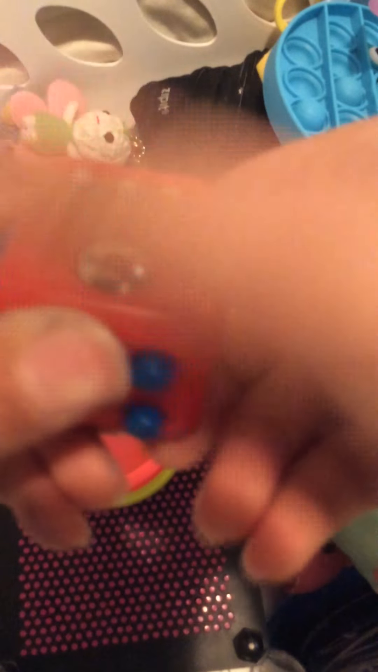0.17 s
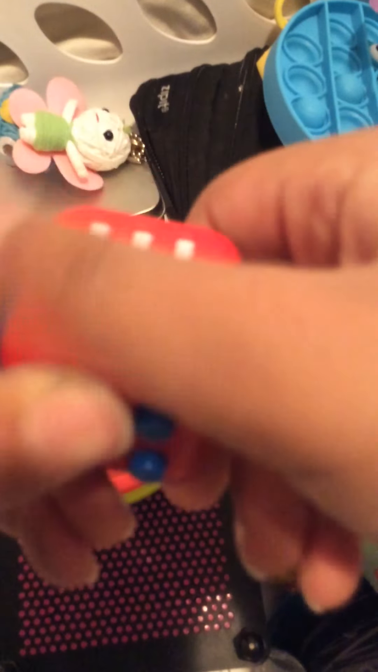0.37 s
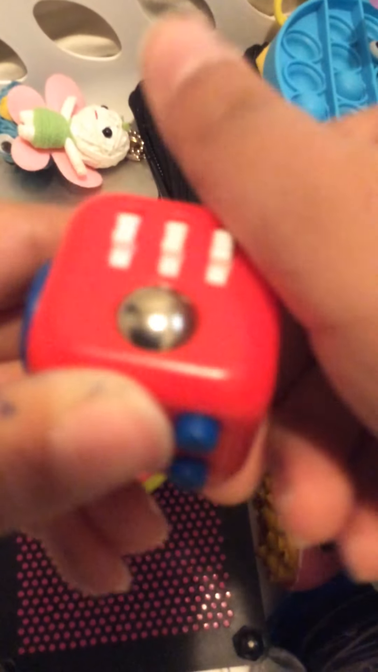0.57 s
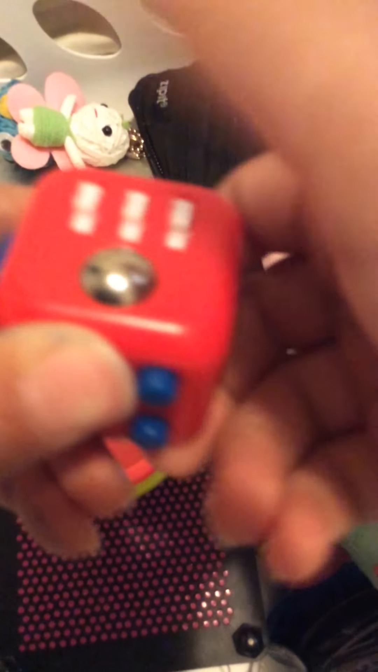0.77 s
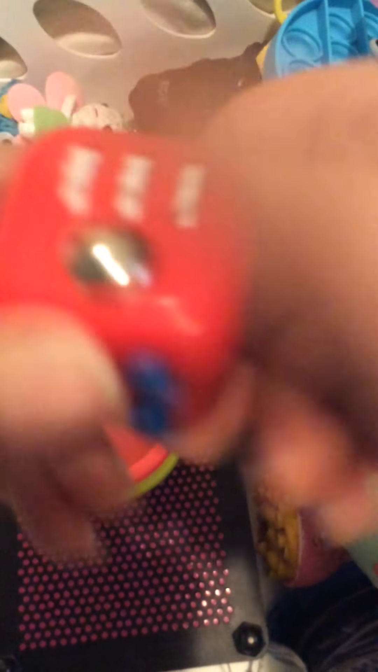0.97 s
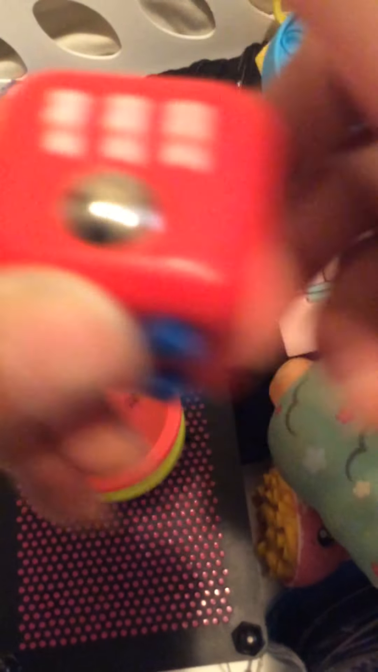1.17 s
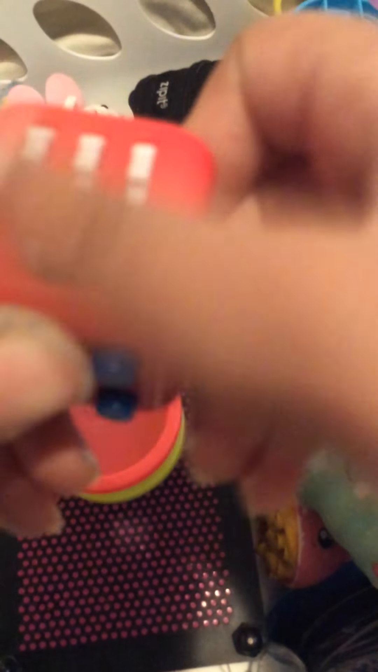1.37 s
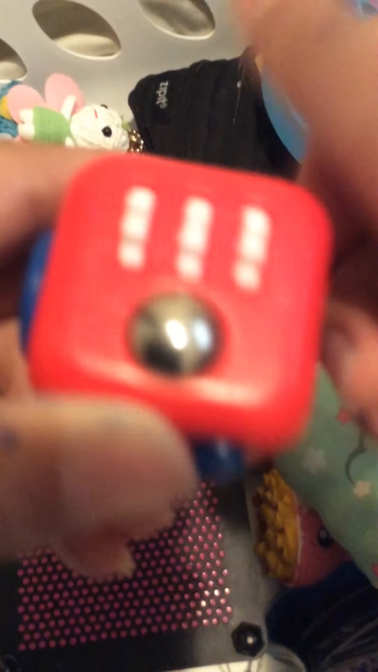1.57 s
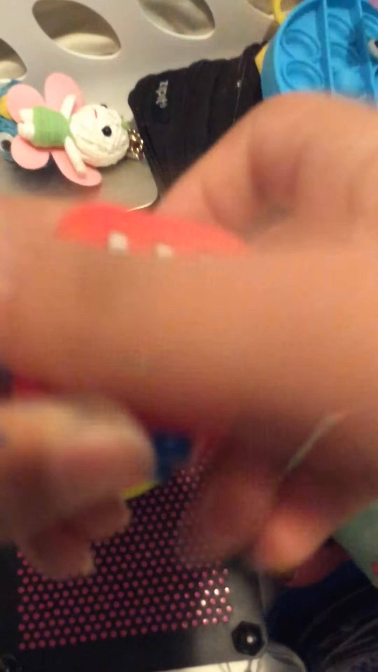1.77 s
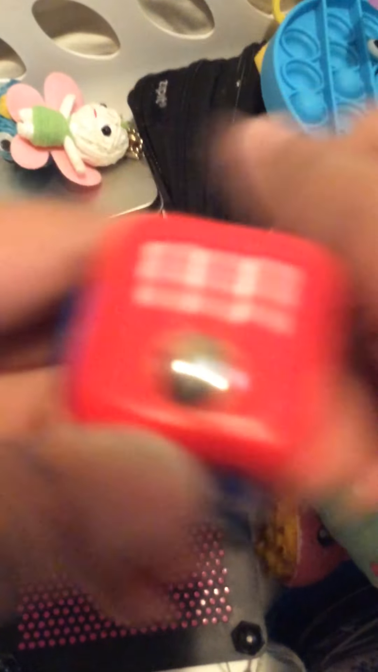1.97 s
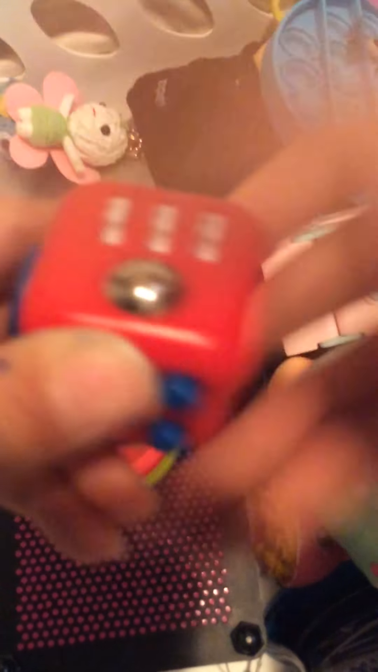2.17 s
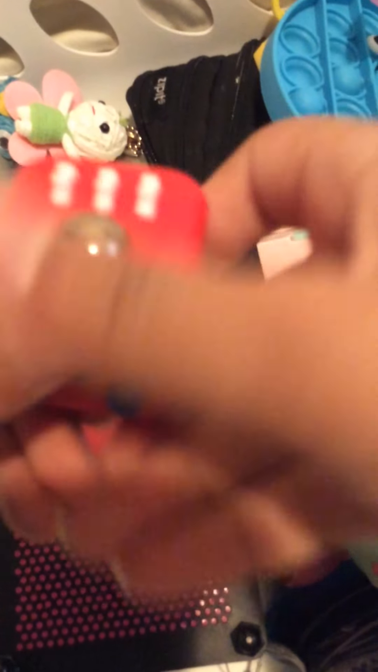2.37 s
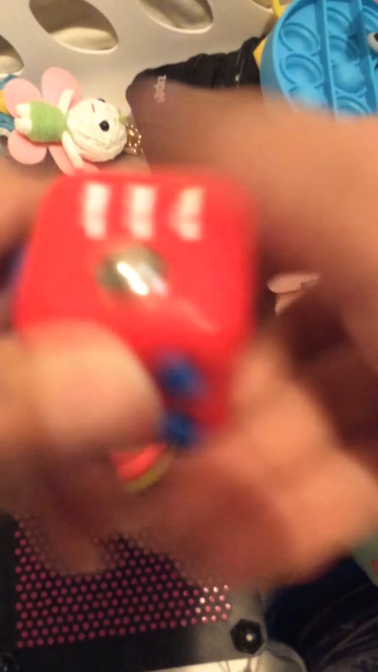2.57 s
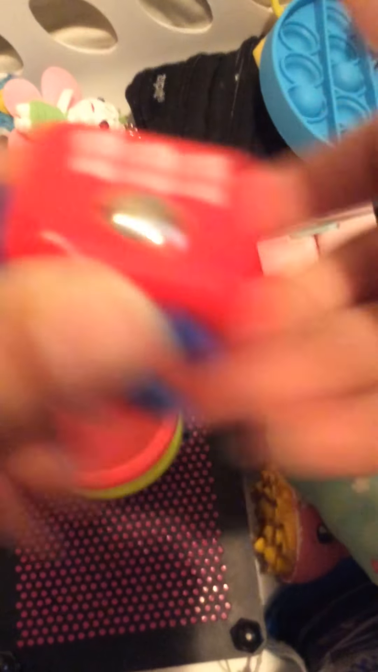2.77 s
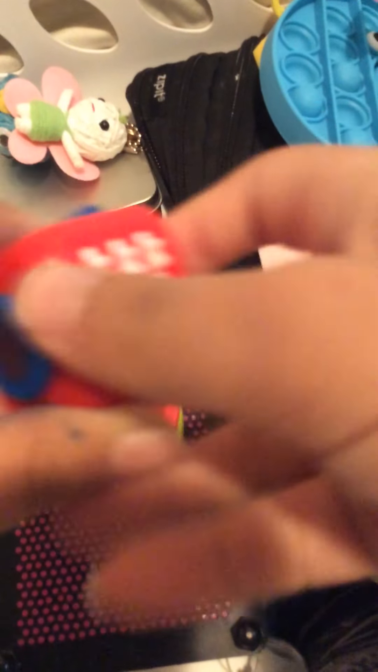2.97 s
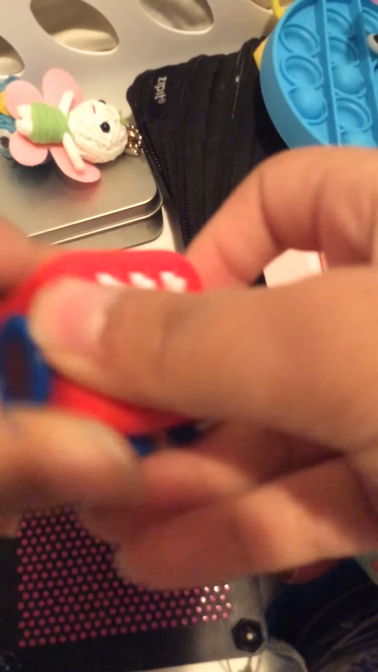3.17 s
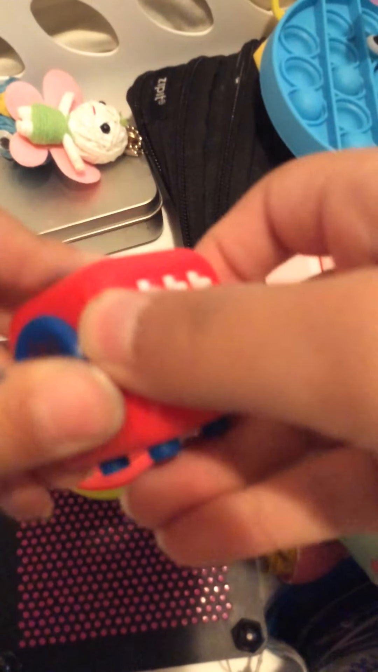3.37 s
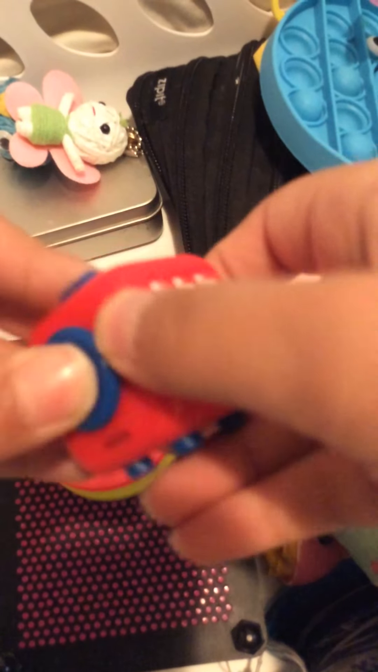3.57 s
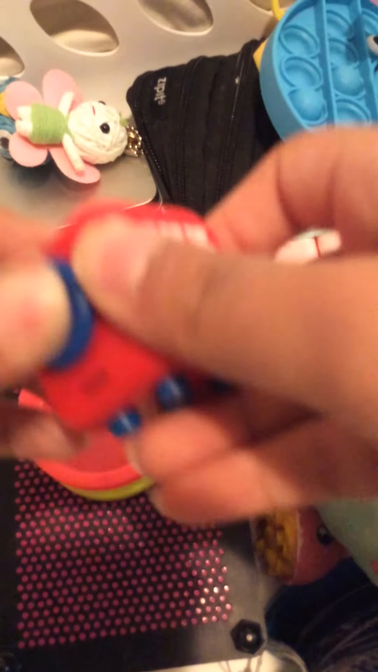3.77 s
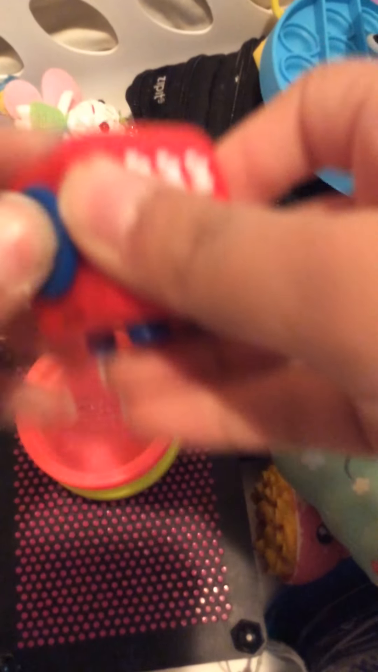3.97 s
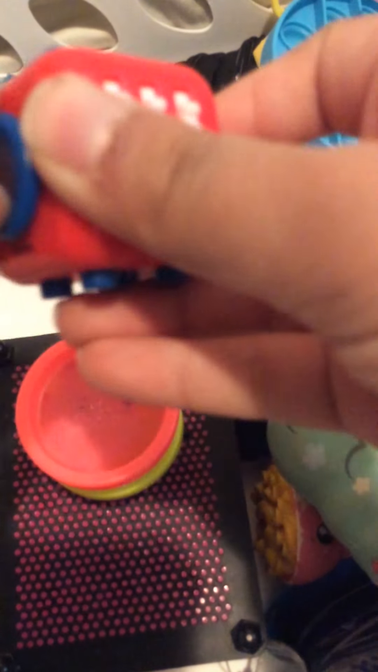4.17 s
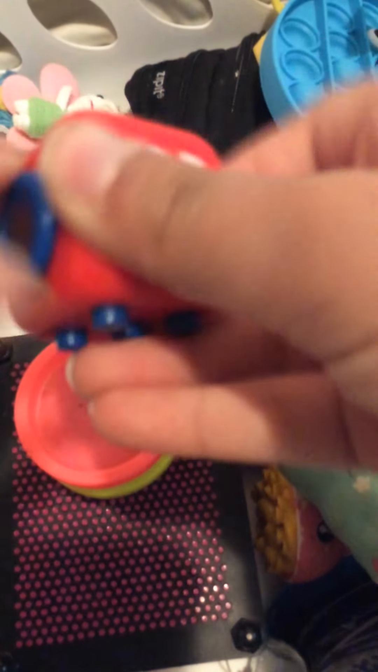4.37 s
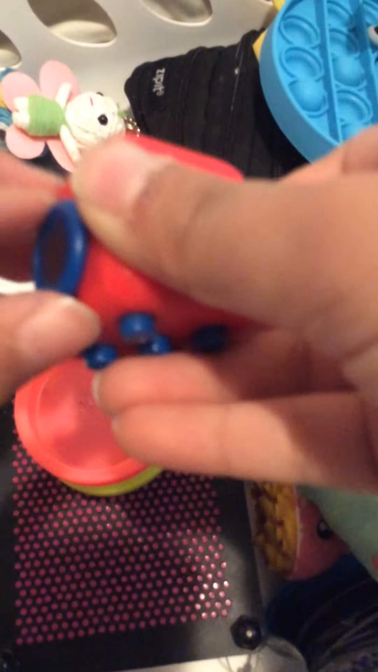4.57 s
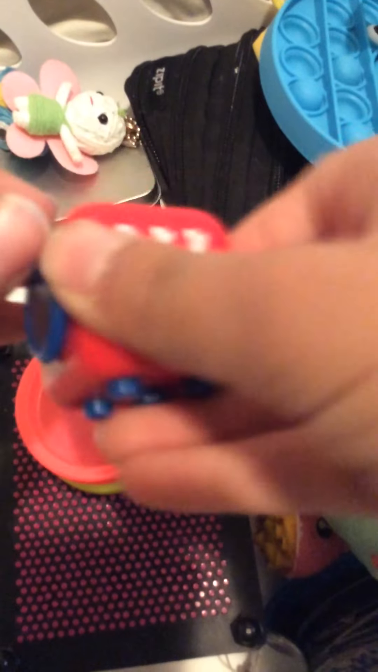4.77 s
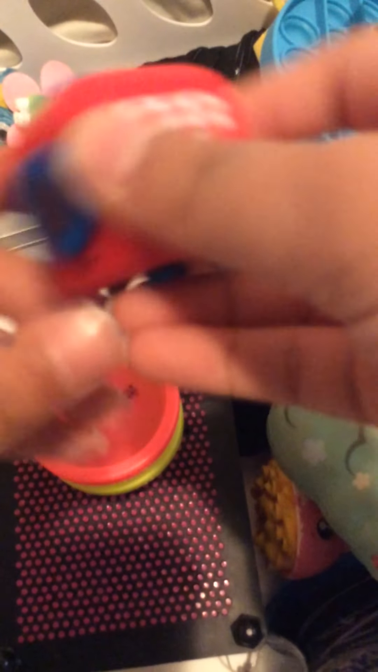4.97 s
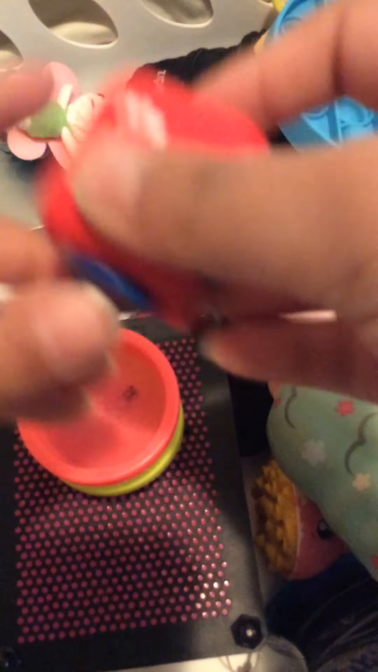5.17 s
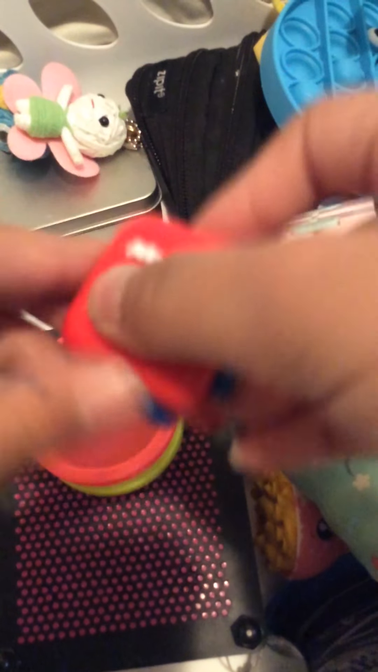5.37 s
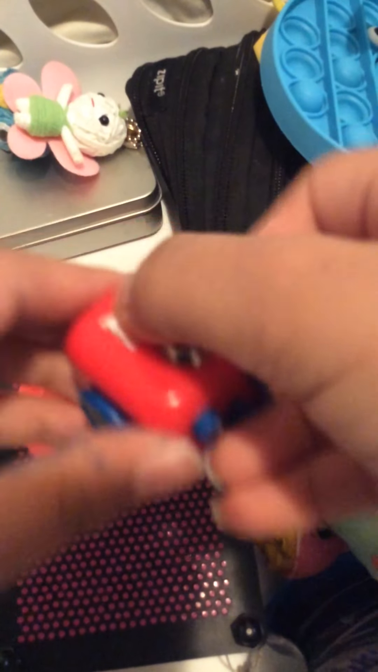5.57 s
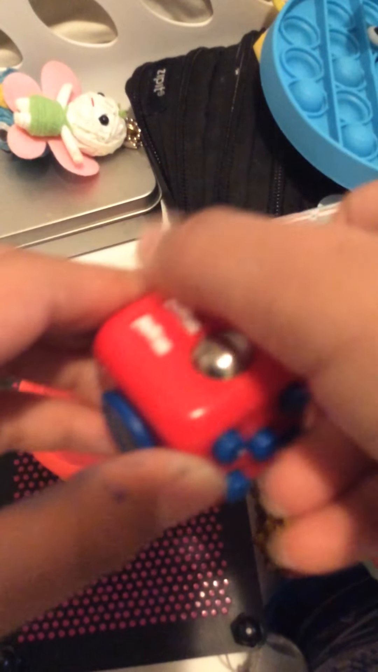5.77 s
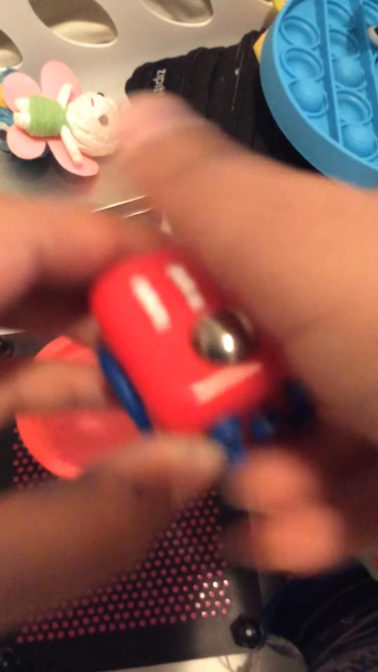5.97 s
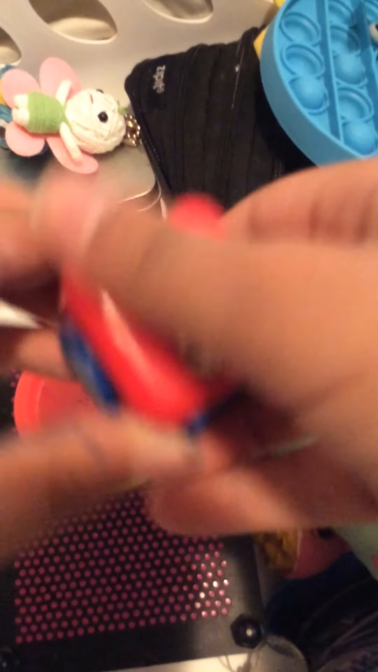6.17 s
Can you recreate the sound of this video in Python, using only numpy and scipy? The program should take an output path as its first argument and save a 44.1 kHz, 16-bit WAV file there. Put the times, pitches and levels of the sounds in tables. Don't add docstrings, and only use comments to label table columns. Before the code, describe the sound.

Very close to a phone microphone in a quiet, soft room, a thumb swipes the ratchet gears of a hollow plastic toy five times, each a fast, crisp burst of clicks with a dull knock. After a regrip come light, irregular ticks of a dial and loose buttons, with two brief rattling shakes. Soft skin rubbing and a faint distant machine hum lie underneath.

```python
import sys
import numpy as np
from scipy import signal
from scipy.fft import rfft, irfft
from scipy.io import wavfile
from scipy.ndimage import uniform_filter1d

SR = 44100
rng = np.random.default_rng(int(sys.argv[2]) if len(sys.argv) > 2 else 0)


def decibels_to_gain(level_db):
    exponent = np.asarray(level_db, float) / 20
    return 10 ** exponent


def to_wav(sig):
    pcm = np.clip(np.atleast_2d(sig), -1, 1) * 32767
    pcm = np.round(pcm).astype(np.int16)
    wavfile.write(sys.argv[1], SR, pcm.T)


N = 274743

GEAR_PANEL_HZ, BUTTON_PANEL_HZ = 5506, 4520


def evened(x):
    return x / np.sqrt(np.mean(x ** 2) + 1e-20)


def peaked(x):
    return x / abs(x).max()


def read(points, hz):
    f, value = np.transpose(points)
    return np.interp(np.log(hz + 1), np.log(f + 1), value)


def add(mix, s, sound):
    at = round(s * SR)
    part = mix[max(at, 0):at + len(sound)]
    part += sound[max(-at, 0):][:len(part)]


def resonate(x, hz, width_hz):
    r = np.exp(-np.pi * width_hz / SR)
    return signal.lfilter([1 - r, 0, r - 1], [1, -2 * r * np.cos(2 * np.pi * hz / SR), r * r], x)


def coloured(points):
    gain = decibels_to_gain(read(points, np.fft.rfftfreq(N, 1 / SR)))
    return irfft(rfft(rng.standard_normal(N)) * gain, N)


def snaps():
    # start in seconds, shell ring in dB, panel ring in dB, crack in dB, tooth tip in dB.
    swipes = [(0.4773, -20, -14.5, -16, -22.5), (0.479, -19.5, -23, -19.5, -24),
              (0.482, -33.5, -32.5, -35.5, -37), (0.494, -38, -37, -28.5, -35),
              (0.4956, -38, -40, -26.5, -26.5), (0.4948, -34, -29.5, -23, -25.5),
              (0.4998, -16.5, -23.5, -5.5, -11), (0.5006, -10, -18, -15.5, -14.5),
              (0.5061, -21, -28.5, -18, -9.5), (0.5126, -40, -33.0, -29.5, -28.5),
              (0.5146, -34.5, -25.5, -6, -11.5), (0.5162, -35.5, -18, -15.5, -4.5),
              (0.5173, -37.5, -25.5, -22.5, -24.5), (0.5214, -42, -33, -28, -28),
              (0.5215, -36, -31.5, -28, -18.5), (0.5257, -32.5, -16.5, -3.5, -5.5),
              (0.5278, -36, -19, -15, -14), (0.5295, -37, -24.5, -17, -22),
              (0.5307, -35, -26, -11.5, -20), (0.5323, -41, -25.5, -16, -27),
              (0.5335, -44, -23, -14, -23.5), (0.5361, -48.5, -25, -23.5, -24.5),
              (0.555, -46.5, -28, -36, -39), (1.0279, -16, -21.5, -13, -17),
              (1.0272, -36.5, -22, -28, -28), (1.0303, -17.5, -25.5, -32, -36.5),
              (1.0403, -19, -24.5, -19.5, -21.5), (1.0412, -15, -16, 0, 1),
              (1.043, -21, -29.5, -14, -8.5), (1.046, -32, -15, -11, -8),
              (1.047, -37.5, -15, -10.5, -5), (1.0517, -32, -26, -21.0, -17.5),
              (1.0536, -27, -19, -25, -23.5), (1.054, -40, -27, -22, -22.5),
              (1.0563, -44.5, -15.5, -23, -11), (1.06, -39.5, -32.5, -27.5, -27.5),
              (1.059, -32, -30, -29.5, -36), (1.0605, -32, -39, -33.5, -28.5),
              (1.069, -34, -22, -16.5, -15.5), (1.069, -34.5, -25.5, -8.5, -18.5),
              (1.491, -51, -42.5, -30.5, -34.5), (1.495, -37.5, -27, -24.5, -29.5),
                    (1.499, -44, -22.5, -21.5, -18.5), (1.5003, -40.5, -17.5, -7, -10.5),
                    (1.504, -34.5, -28, -27.5, -31.5), (1.509, -33, -11.5, -5, 0.5),
                    (1.5123, -38, -21.5, -27, -20), (1.516, -36, -37, -30.5, -26.5),
                    (1.517, -29, -16.5, -5, -3), (1.5178, -35, -18, -9, -10.5),
                    (1.5226, -36, -19, -21, -12), (1.5254, -32.5, -17.5, -7.5, -6),
                    (1.5268, -34.5, -19, -4.5, -10), (1.5282, -45, -23.5, -18, -19.5),
                    (1.5295, -47, -28, -22.5, -30.5), (1.534, -42.5, -24, -26, -27.5),
                    (1.5332, -44.5, -26.5, -19, -20.5), (1.5373, -40.5, -25.5, -10, -9.5),
                    (1.5395, -47.0, -23.5, -16, -21.5), (1.5414, -50.5, -33.5, -30, -31),
                    (1.5417, -54.5, -35.5, -34.5, -32), (1.5456, -42.5, -35, -20.5, -25),
                    (1.9023, -61.5, -63, -60, -52), (1.9042, -63.5, -62, -52, -47),
                    (1.9067, -64, -57, -48.5, -42.5), (1.91, -48, -34.5, -22.5, -29),
                    (1.953, -58, -34, -41, -43.5), (1.96, -43, -27, -24.5, -28),
                    (1.983, -60.5, -43, -35.5, -36.5), (1.9912, -49, -29.5, -26, -32.5),
                    (1.9936, -46.5, -34.5, -18, -18.5), (1.995, -48, -28.5, -15.5, -21),
                    (1.999, -48.5, -23.5, -13.5, -4), (2.0013, -41, -23.5, -26, -19.5),
                    (2.002, -35, -13, -11.5, -4), (2.0019, -47.5, -13, -9.5, -18),
                    (2.006, -33.5, -14.5, -7, -7.5), (2.0042, -39.5, -18.5, -11, -14),
                    (2.0112, -39, -43.5, -28, -25), (2.0086, -34, -27.5, -13.5, -18),
              (2.518, -64.0, -51, -51, -27), (2.52, -62.0, -52.5, -49, -25),
                  (2.523, -64.0, -58, -52, -29), (2.526, -56, -47.0, -42, -25),
                  (2.5298, -49, -37.5, -30, -30), (2.5329, -66.5, -52, -37, -45),
                  (2.5376, -33, -53, -36, -40), (2.5392, -58, -32, -33, -34), (2.5431, -32, -17, -8.5, -19),
                  (2.548, -62, -39, -32, -40), (2.5492, -38, -37.5, -40, -36.5),
                  (2.555, -39, -45.5, -40, -51), (2.625, -45, -41, -35.5, -35),
                  (2.6236, -40, -40.5, -29, -24.5), (2.626, -66, -30, -26.5, -34),
                  (2.629, -42, -37.5, -34, -38), (2.6327, -64, -42, -41, -53), (2.638, -48, -48, -49, -45),
                  (2.6435, -50, -18, -12, -17), (2.647, -47, -33, -31, -27), (2.6486, -61, -40, -38.5, -40),
                  (2.6523, -42, -23, -17, -29), (2.6545, -29, -17, -11.5, -12),
                  (2.6557, -67.5, -13, -44, -10), (2.6611, -34.5, -35, -27, -37),
                  (2.6654, -45.5, -25, -17, -25), (2.6686, -53, -36, -23, -37),
                  (2.6704, -48, -28, -17, -18), (2.6726, -24.5, -8.5, -16, -13),
                  (2.689, -43, -54, -55, -49), (2.6946, -46, -51, -47, -46), (2.7024, -40.5, -33, -34, -20),
                  (2.7116, -40.5, -26, -32, -45), (2.7136, -42, -32, -28, -37.5)]
    rattles = [(4.0453, -63, -55, -72.5, -71), (4.049, -43.5, -49, -50, -57),
               (4.0508, -57.5, -57, -54, -64), (4.0586, -63, -53, -67, -64), (4.068, -35, -43, -32.5, -41),
               (4.065, -51, -36, -39, -44.0), (4.0696, -54, -33, -44.0, -44.5),
               (4.074, -54, -41, -35, -42.0), (4.0766, -27, -27, -34, -38),
               (4.0834, -33, -34, -30.5, -47.0), (4.0857, -45, -39, -45, -49), (5.776, -74, -63, -56, -54),
               (4.0866, -56, -33, -56, -52.0), (4.096, -58.0, -47.0, -57, -55.5),
               (4.0975, -63, -50.0, -41, -37), (4.099, -69, -57, -34, -27.5), (4.102, -67.0, -67, -53, -43),
               (5.716, -46.5, -23.5, -24.5, -38), (5.721, -45.5, -34, -35, -35),
               (5.7476, -47, -27, -30, -27), (5.7566, -56, -61, -41, -51.0), (5.8065, -49, -29.5, -37, -35),
               (5.811, -59, -44, -39, -45), (5.815, -45, -35, -23.5, -41), (5.8193, -66.5, -40, -39, -45.5),
               (5.824, -60, -43, -39.0, -44.0), (5.827, -58, -41, -49.0, -54.5), (5.85, -54, -62, -31, -37),
               (5.8509, -70, -48, -40, -48), (5.8538, -63, -38, -44.0, -44), (5.862, -53, -39, -41, -44),
               (5.889, -61, -54, -42, -43), (5.911, -66, -39, -34, -45), (5.9155, -63, -34.5, -27, -41.0),
               (5.918, -55, -49, -26, -24), (5.9193, -58, -58, -18.5, -19), (5.929, -61.5, -46, -55, -49),
               (5.947, -66, -69, -64, -48)]
    # start in seconds, shell ring in dB, panel ring in dB, crack in dB.
    touches = [(.0096, -64, -41, -29), (0.03, -66, -38, -47), (0.0351, -48, -32, -29.5),
               (0.039, -44.5, -41, -27), (0.183, -71, -42.5, -35), (0.191, -56.5, -47, -50),
               (.325, -43, -45.5, -45), (0.3817, -59, -57, -46), (0.3924, -51.5, -45, -46),
               (0.963, -38, -46.5, -48), (0.97, -42.5, -48.5, -37), (1.1085, -35.5, -44, -42),
               (1.3958, -40.5, -48.5, -34.5), (1.4528, -68.5, -61, -33.5), (1.5763, -45, -36.5, -33.5),
               (1.5926, -41, -40, -33.5), (1.6507, -56, -45.5, -66), (1.8735, -48.5, -52, -53.5),
               (1.934, -53.5, -39, -34.5), (2.5, -71, -56, -37), (2.174, -57, -35.5, -78),
               (2.272, -46.5, -61, -53), (2.28, -45, -56, -53), (2.339, -47.5, -59, -48),
               (2.377, -53.5, -50.5, -58), (2.409, -66, -52, -56.5), (2.428, -57.5, -58, -61.5),
               (2.441, -67, -59, -62), (2.249, -59, -49, -48.5)]
    dial = [(2.826, -68, -39, -61), (2.84, -71, -38, -40.5), (2.867, -46, -35.5, -25),
            (2.8846, -51, -42, -64), (3.004, -52, -46, -55), (3.0718, -43.5, -27, -36.5),
            (3.22, -56, -37, -46), (3.286, -60, -37, -51), (3.293, -46.5, -46, -32), (3.315, -60, -47, -42),
            (3.325, -54, -43, -48), (3.406, -40, -40, -76), (3.5777, -34.5, -31, -32.5),
            (3.702, -55, -39, -39), (4.148, -49, -57, -46.5), (4.773, -63, -67, -35.5),
            (4.7881, -71, -28, -28), (4.8611, -73, -42.5, -38), (4.927, -45, -69, -51),
            (4.936, -39, -43, -30.5), (4.9666, -41.5, -44, -42), (5.3512, -69, -37.5, -54),
            (5.4612, -55, -51, -45), (5.5784, -64, -43.5, -41), (6.081, -67, -34.5, -27),
            (6.108, -53, -46.5, -50)]
    buttons = [(2.993, -62, -45, -48), (3.121, -37, -51, -52), (3.174, -40, -51.5, -58),
               (3.2335, -51, -67, -38), (3.3995, -45.5, -40.5, -54), (3.52, -54, -63, -47),
               (3.5414, -52, -53.5, -50), (3.5808, -33, -45, -64), (3.6415, -33, -42, -42.5),
               (3.9361, -59, -47, -49), (3.9538, -53.5, -46, -50), (3.995, -58.5, -59, -66),
               (4.125, -59, -51, -71), (4.139, -53.5, -44, -64), (4.435, -55.5, -45, -48.5),
               (4.46, -45, -48, -58), (4.7794, -32, -30, -36.5), (4.952, -48, -49, -34.5),
               (5.2036, -52, -41, -77), (5.228, -38, -46, -51), (5.456, -52, -49, -33.5),
               (5.6088, -52, -57.5, -36), (6.021, -55, -45, -45.5), (6.179, -49.5, -40, -67)]
    faint = [(1.737, -49, -65.5, -57), (2.318, -75.5, -75, -54), (3.421, -53, -63, -73),
             (3.492, -66, -51.5, -71), (3.5282, -54, -67, -44), (3.5608, -42.5, -53, -68),
             (4.1867, -51.5, -49.5, -61), (4.273, -80, -69, -49), (4.33, -57.5, -52.5, -60),
             (4.477, -50, -51.5, -49), (4.8023, -49, -62, -68), (4.918, -43, -65, -62),
             (5.087, -58, -50.5, -73), (5.112, -70.5, -53.5, -56), (5.336, -51.5, -61.5, -51.5),
             (5.4431, -57, -71, -43.5), (5.5365, -51.5, -46, -55.5), (5.69, -68, -51.5, -54.5),
             (6.1323, -48, -52, -63), (6.1998, -52, -72, -76)]

    sprung_chatter_db, loose_chatter_db, loose_tip_db = -17.5, -10.5, -2
    rows = []
    for sprung, loose, panel_hz in [(swipes, touches + dial, GEAR_PANEL_HZ),
                                    (rattles, buttons + faint, BUTTON_PANEL_HZ)]:
        rows += [(*row, sprung_chatter_db, panel_hz) for row in sprung]
        rows += [(*row, row[-1] + loose_tip_db, loose_chatter_db, panel_hz) for row in loose]

    out, chance = np.zeros(N), rng.standard_normal((len(rows), 1600))
    lead_s, grip_detune = 0.0064, 0.023
    for (s, *strike, panel_hz), noise in zip(rows, chance):
        hz = panel_hz * (1 + grip_detune * noise[-11])
        add(out, s - lead_s, snap(*strike, hz, noise))
    return out


def snap(shell_db, panel_db, crack_db, tip_db, chatter_db, panel_hz, noise):
    # frequency in Hz, width in Hz, level in dB.
    crack_modes = [(8420, 1400, 1), (6630, 740, -15)]
    tip_modes = [(10100, 920, 3.5), (12030, 1000, -7.5), (14700, 1400, -24)]
    # frequency in Hz, level in dB, t60 in seconds.
    shell_modes = [(1715, -1.5, 0.02), (1906, 1.5, 0.012)]

    t = np.arange(len(noise)) / SR - 0.006
    before, after = np.minimum(t, 0), np.maximum(t, 0)
    lumps = decibels_to_gain(4.0 * evened(uniform_filter1d(noise[::-1], 25)))
    lead_in = (t < 0) * decibels_to_gain(chatter_db - 5 + 60 * before / 0.012)
    rattle = (t > 0) * decibels_to_gain(chatter_db - 60 * after / 0.02)
    slip = (1 - np.exp(-(after / 0.0003) ** 2)) * decibels_to_gain(-60 * after / 0.0027)
    scrape = noise * (lead_in + rattle) * lumps
    chatter = np.sign(noise) * slip + scrape

    detune = 1 + 0.03 * noise[-5:]
    crack, tip = (
        sum(decibels_to_gain(db + 1.9 * luck) * resonate(chatter, hz * d, width_hz)
            for (hz, width_hz, db), d, luck in zip(modes, detune, noise[-10:]))
        for modes in (crack_modes, tip_modes))
    tip = resonate(tip, 11500, 5000)
    highpass = signal.butter(2, 3600, "high", fs=SR)
    crack, tip, skirt = signal.lfilter(*highpass, [crack, tip, chatter])

    struck = 2 * (abs(t) < 0.5 / SR) + decibels_to_gain(-5.5) * scrape
    panel = resonate(resonate(resonate(struck, panel_hz, 400), panel_hz, 1300), panel_hz, 1600)
    panel = panel + decibels_to_gain(-10) * resonate(skirt, panel_hz, 2000)
    shell = sum(decibels_to_gain(db) * resonate(struck, hz * d, 1.9 / t60_s)
                for (hz, db, t60_s), d in zip(shell_modes, detune))
    shell = resonate(shell, 1950, 1100)
    return (decibels_to_gain(crack_db + 1.02) * peaked(crack) + decibels_to_gain(tip_db - 4.0) * peaked(tip)
            + decibels_to_gain(panel_db + 0.5) * peaked(panel) + decibels_to_gain(shell_db - 2.5) * peaked(shell))


def knocks():
    # start in seconds, level in dB, pitch in Hz.
    pushes = [(0.4763, -36.5, 520), (0.478, -35, 1090), (0.4991, -25.5, 380), (0.542, -34, 1250),
              (0.542, -42, 480), (1.027, -34.5, 520), (1.04, -32.5, 520), (1.042, -32.5, 1132),
              (1.393, -49, 344), (1.501, -34.5, 700), (1.524, -41.5, 450), (1.569, -45, 800),
              (1.592, -48.5, 402), (2.007, -39.5, 750), (1.961, -48, 600), (2.032, -47, 600),
              (2.531, -42.5, 850), (2.543, -35, 950), (2.653, -46, 750), (2.702, -45, 650),
              (3.232, -48.5, 785), (4.224, -47.5, 407), (4.778, -49.5, 350), (5.721, -49.5, 676),
              (5.755, -53.5, 727), (5.865, -53, 690)]
    out, chance = np.zeros(N), rng.standard_normal((len(pushes), 1200))
    for (s, db, hz), noise in zip(pushes, chance):
        force = puff(noise, chatter_db=-26, t60_s=0.057)
        push = resonate(resonate(force, hz, 650), hz, 670)
        add(out, s, decibels_to_gain(db) * peaked(push))
    return out


def puff(noise, chatter_db, t60_s):
    t = np.arange(len(noise)) / SR
    return (t == 0) + noise * decibels_to_gain(chatter_db - 60 * t / t60_s)


def rub():
    # frequency in Hz, level in dB per Hz.
    skin_spectrum = [(1500, -57.5), (2600, -15.5), (4600, -6), (5500, -8.5), (6900, -5.5), (12600, -3.5),
                     (13600, -22), (16500, -36.5)]
    slips_per_s, slip_decay_s, regrip_s = 700, 0.0012, 2.6

    t = np.arange(N) / SR
    on_skin, on_shell = strokes(t)
    slip_here = rng.random(N) < slips_per_s / SR
    slips = slip_here * decibels_to_gain(2.5 * np.minimum(rng.exponential(1, N), 4))
    grain = evened(1.0 + signal.lfilter([1], [1, -np.exp(-1 / (slip_decay_s * SR))], slips))
    hiss = evened(coloured(skin_spectrum) * grain)

    force = rng.standard_normal(N) * grain
    force = force * decibels_to_gain(5.0 * evened(uniform_filter1d(rng.standard_normal(N), 400)))
    shell = evened(resonate(resonate(force, 1880, 350), 1880, 600))
    gear_panel = resonate(force, GEAR_PANEL_HZ, 290)
    button_panel = resonate(force, BUTTON_PANEL_HZ, 470)
    panel = np.where(t < regrip_s, gear_panel, button_panel)
    return on_skin * (hiss + decibels_to_gain(-6) * evened(panel)) + on_shell * shell


def strokes(t):
    # start in seconds, length in seconds, level in dB, share through the shell in dB.
    slides = [(0.0, 0.031, -50.5, -17), (0.387, 0.12, -62.5, 4), (0.499, 0.011, -28, -7),
              (0.562, 0.04, -59, -22), (1.024, 0.0092, -41, -4), (1.076, 0.045, -50.5, -4),
              (1.445, .045, -56, -8.5), (1.498, 0.05, -32.5, -12.5), (1.567, 0.04, -48, -5.5),
              (1.885, 0.11, -56.5, -5), (1.995, 0.069, -41, -6.5), (2.083, 0.082, -68.5, -16),
              (2.179, 0.19, -62.5, -20), (2.507, 0.08, -51.5, -7), (2.628, 0.11, -47.5, -0.5),
              (2.828, 0.02, -54, -12), (3.219, 0.13, -70, 6.5), (3.51, 0.039, -62.5, 1),
              (4.068, 0.011, -62, -1), (4.775, 0.053, -65.5, 4.5), (4.92, 0.094, -52.5, -2),
              (5.203, 0.058, -63, -25), (5.352, 0.14, -63, -11), (5.537, 0.052, -61, -9),
              (5.71, 0.16, -57, -3.5), (5.898, 0.05, -61.5, -7), (6.086, 0.042, -61.5, -4)]
    # start in seconds, end in seconds.
    pauses = [
        (.62, .94),
        (1.14, 1.2),
        (4.561, 5.5),
    ]
    press_db_per_s, sag_db_per_s, lift_db_per_s = 1201, 133.5, 797.5
    resting_db, resting_shell_db, still_db = -77.5, -3.5, -16.5

    s, length_s, level_db, shell_db = np.transpose(slides)[..., None]
    step = t[::64]
    since = step - s
    shape_db = press_db_per_s * np.minimum(since, 0) - sag_db_per_s * np.maximum(since, 0)
    shape_db = shape_db - lift_db_per_s * np.maximum(since - length_s, 0)
    each = decibels_to_gain(level_db + shape_db)
    pause = sum((step > a) & (step < b) for a, b in pauses)
    resting = decibels_to_gain(resting_db + still_db * uniform_filter1d(1. * pause, size=30))
    skin = resting + each.sum(0)
    shell = resting * decibels_to_gain(resting_shell_db) + (each * decibels_to_gain(shell_db)).sum(0)
    return np.interp(t, step, skin), np.interp(t, step, shell)


def room(x):
    # frequency in Hz, t60 in seconds.
    decay = [(500, 0.21), (2000, 0.12), (6000, 0.032), (14000, 0.04)]
    taps = np.zeros(SR // 2)
    at = np.arange(150, len(taps) - 20, 20)
    taps[at + rng.integers(0, 20, len(at))] = rng.choice([-1., 1.], len(at))
    hz, t, z = signal.stft(taps, SR, nperseg=256)
    fade = decibels_to_gain(-60 * t / read(decay, hz)[:, None])
    tail = signal.istft(z * fade, SR, nperseg=256)[1]
    return signal.fftconvolve(x, tail / np.linalg.norm(tail))[:N]


def background():
    # frequency in Hz, level in dB per Hz.
    air_spectrum = [(15, -55), (45, -21), (62, -16), (100, -18), (146, -18), (304, -29), (560, -34),
                    (787, -31), (1980, -45), (14800, -45), (16500, -52.5)]
    # frequency in Hz, peak level in dB.
    motor_lines = [(79.93, -61), (120, -74), (90.57, -76), (40, -77)]
    air_db = -70

    air = coloured(air_spectrum)
    above = signal.sosfilt(signal.butter(4, 150, "high", fs=SR, output="sos"), air)
    air = air / np.std(above)
    t = np.arange(N) / SR
    motor = sum(decibels_to_gain(db) * np.sin(2 * np.pi * (hz * t + rng.random())) for hz, db in motor_lines)
    throb = 1 + 0.33 * np.cos(2 * np.pi * 5.33 * (t - 0.126))
    return decibels_to_gain(air_db) * air + decibels_to_gain(-0.5 - 0.3 * t) * motor * throb


def scene():
    room_db = -25
    toy = snaps() + knocks()
    return (toy + decibels_to_gain(room_db) * room(toy) + rub() + background())[None]


def roll_off(x):
    return signal.sosfilt(signal.butter(12, 16970, fs=SR, output="sos"), x)


def record(dry):
    limited = 1.5 * np.tanh(dry / 1.5)
    edge = signal.firwin(151, 15900, window=("kaiser", 8), fs=SR)
    mix = signal.oaconvolve(limited, edge[None], "same")
    return roll_off(mix)


dry = scene()
out = record(dry)
to_wav(out)
```